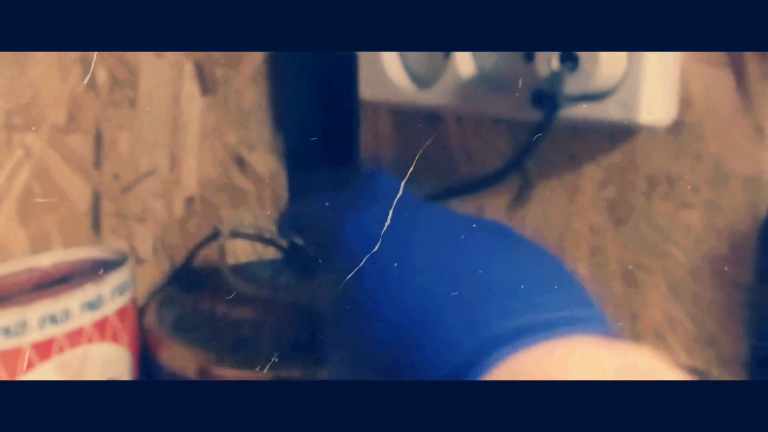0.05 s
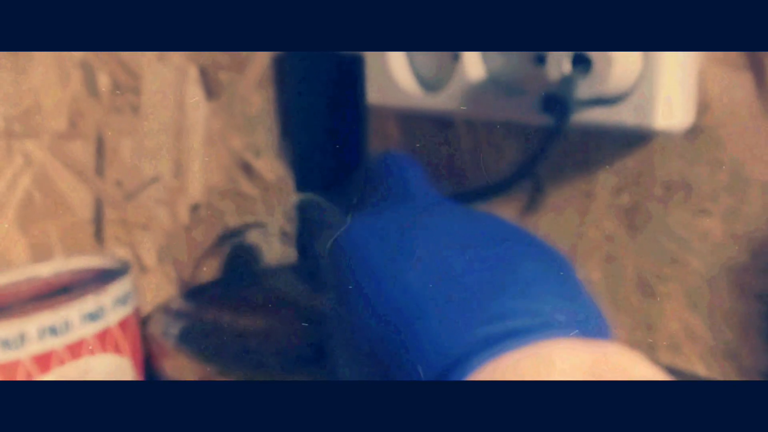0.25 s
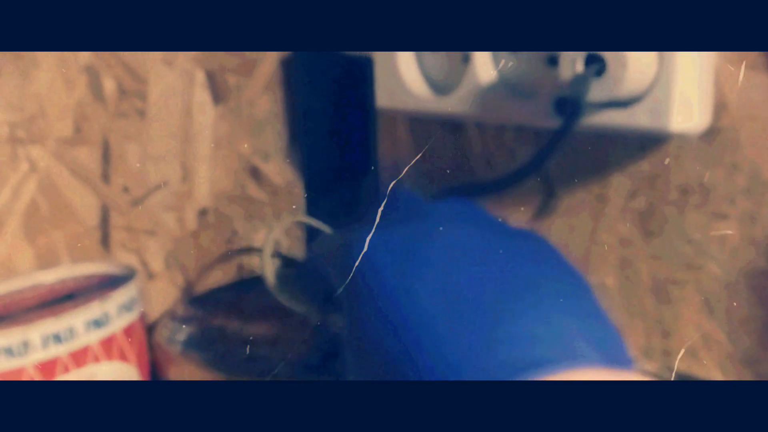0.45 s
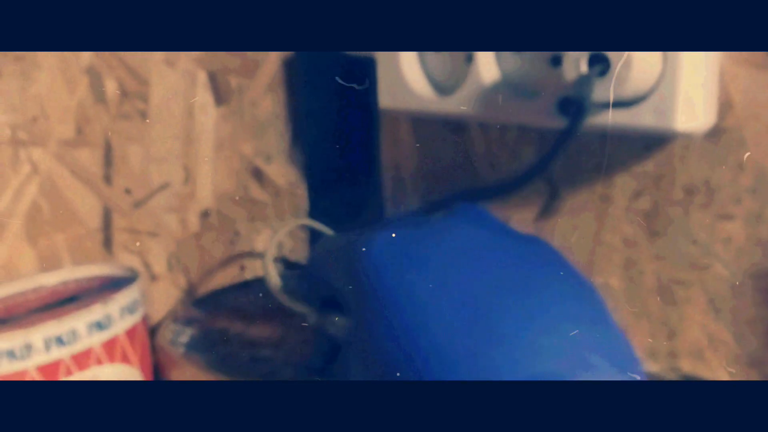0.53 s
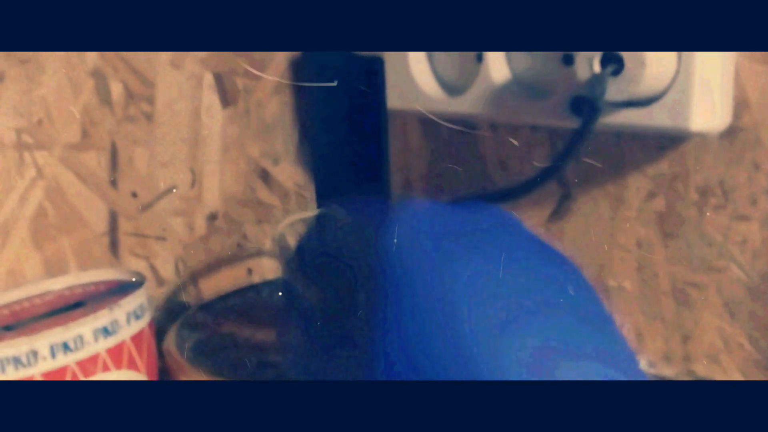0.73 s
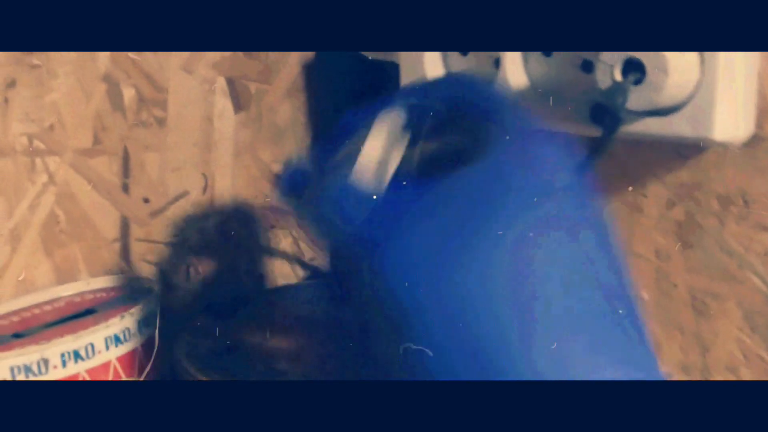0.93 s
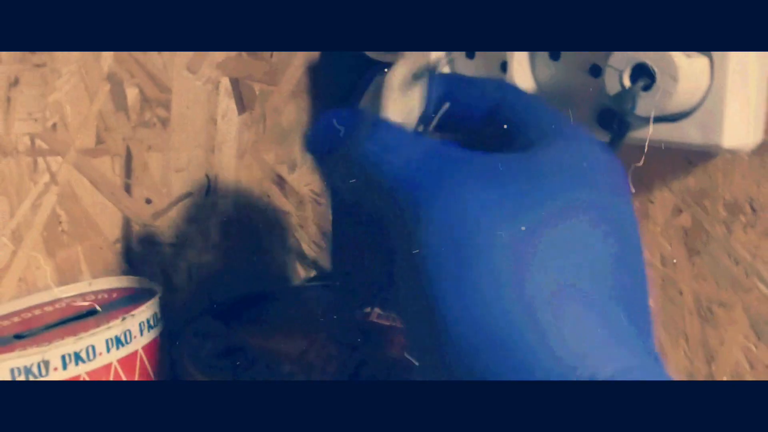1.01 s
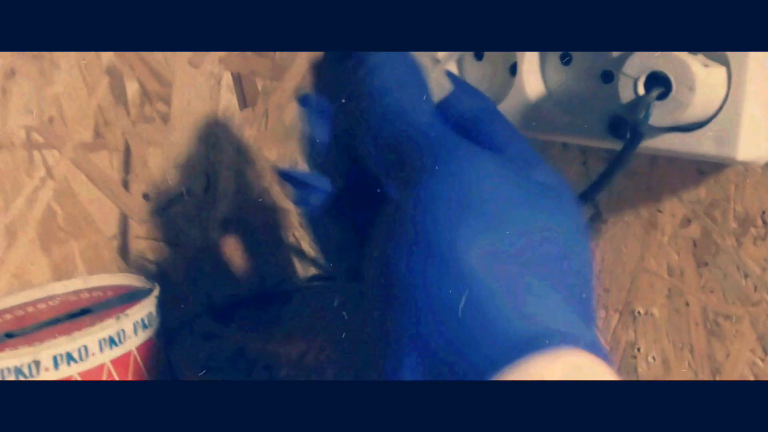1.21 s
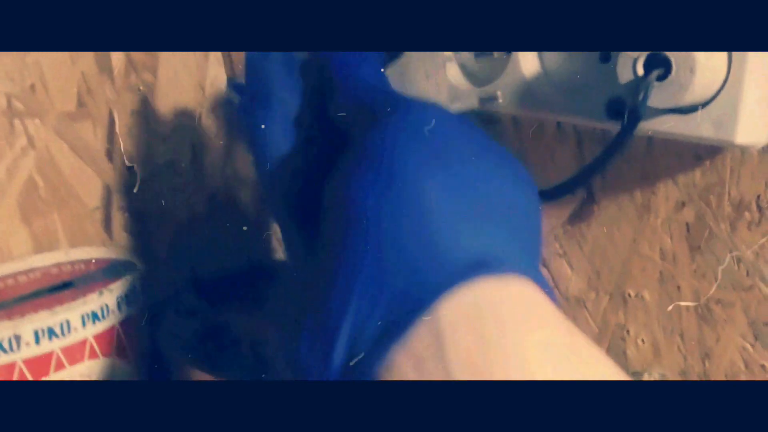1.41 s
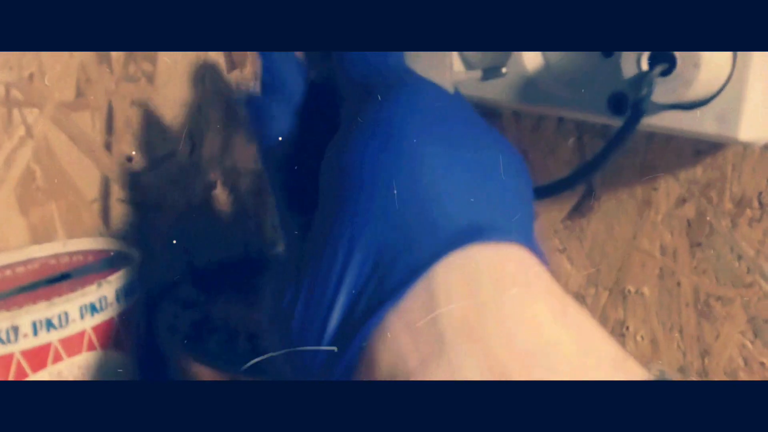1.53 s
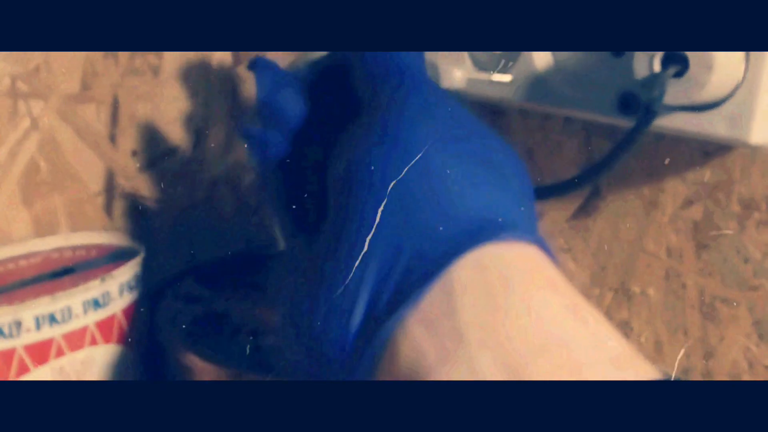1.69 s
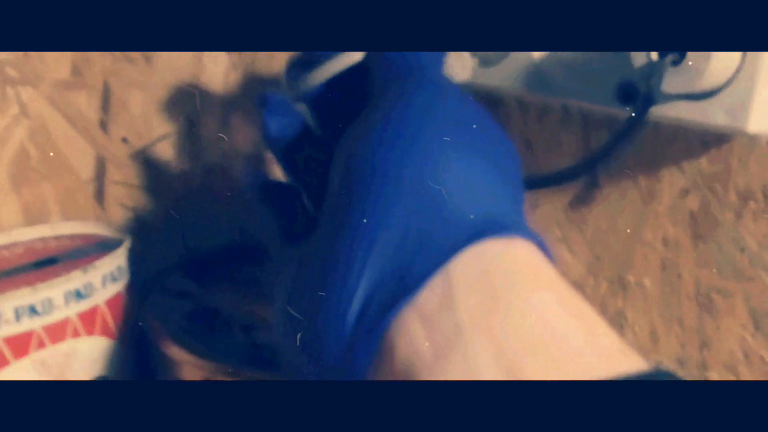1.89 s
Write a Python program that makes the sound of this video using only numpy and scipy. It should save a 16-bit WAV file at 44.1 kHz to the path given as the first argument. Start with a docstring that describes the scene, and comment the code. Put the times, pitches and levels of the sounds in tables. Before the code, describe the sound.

A tin can knocks three times in quick succession on a wooden bench, thudding and ringing briefly. A rubber-gloved hand then shuffles things with soft bumps, light ticks, short drags and swishes, heard close in a small quiet workshop.

```python
"""Faint room noise and two soft bumps, then a tin can knocks three times on a wooden bench.
At each knock the bench thuds, the tin rings and the contact cracks. The rubber-gloved hand
then shuffles things about: padded bumps, light ticks, short drags and swishes of the glove.
A small quiet workshop, heard from close by through a stereo microphone with two close ports."""
import sys
import numpy as np
from scipy import signal
from scipy.fft import rfft, irfft
from scipy.io import wavfile

SR = 44100
rng = np.random.default_rng(int(sys.argv[2]) if len(sys.argv) > 2 else 0)


def int16_out(signal):
    """Quantize to a 16-bit WAV file."""
    q = np.round(np.clip(np.atleast_2d(signal).T, -1, 1) * 32767)
    wavfile.write(sys.argv[1], SR, q.astype(np.int16))


N = 85995
HIT_SIZE = 20480  # samples in one blow or echo

# spectrum of the wooden bench top, struck or rubbed: frequency_hz, level_db
WOOD_SPECTRUM = [(30, -54), (80, -32), (130, -17.5), (180, -6), (300, 1), (420, 2), (660, -1), (800, -11.5),
                 (1200, -22.5), (2500, -35), (8000, -73)]


def undb(db):
    """Decibels to gain."""
    return 10 ** (np.asarray(db) / 20)


def unit(x):
    """Scale to rms 1."""
    return x / np.sqrt(np.mean(x ** 2))


def clock(size=N):
    """Sample times in seconds."""
    return np.arange(size) / SR


def fade(t60_s):
    """Exponential decay from 1."""
    return np.exp(-np.log(1000) * clock(HIT_SIZE) / t60_s)


def attack(rise_s):
    """Exponential rise toward 1."""
    return 1 - np.exp(-clock(HIT_SIZE) / rise_s)


def shape(x, gain):
    """Filter a sound by a gain that is a function of frequency."""
    size = x.shape[-1]
    hz = np.maximum(np.fft.rfftfreq(size, 1 / SR), 1)
    return irfft(rfft(x) * gain(hz), size)


def along(f, points):
    """Read (Hz, value) points on a log-frequency axis."""
    hz, value = np.array(points).T
    return np.interp(np.log(f), np.log(hz), value)


def colour(x, points):
    """Give a sound a spectrum of (Hz, dB) points, at rms 1."""
    return unit(shape(x, lambda f: undb(along(f, points))))


def resonance(x, hz, width):
    """One broad resonance, its width a share of its pitch, at rms 1."""
    return unit(shape(x, lambda f: 1 / (1 + ((f / hz - hz / f) / width) ** 2)))


def noise(size=N, side=0.079):
    """Noise at the two microphone ports: alike in the bass, partly unrelated above."""
    mid, apart = rng.standard_normal((2, size))
    apart = side * shape(apart, lambda f: f / np.hypot(f, 940))
    return np.array([mid + apart, mid - apart])


def add(out, start_s, x):
    """Mix a sound in at its time."""
    i = int(np.clip(start_s * SR, 0, N - 1))
    out[:, i:i + x.shape[-1]] += x[..., :N - i]


def grain(spread_db=2.5, rate_hz=921):
    """Uneven grip of a sliding surface, as a gain."""
    grip = np.interp(clock() * rate_hz, np.arange(N), rng.standard_normal(N))
    return unit(undb(spread_db * grip))


def swell(middle_s, half_length_s):
    """A stroke that rises and falls."""
    return 1 / np.cosh(np.clip(1.28 * (clock() - middle_s) / half_length_s, -20, 20))


def ring(modes):
    """Decaying modes after one blow, one row each."""
    t = clock(HIT_SIZE)
    return np.array([undb(db) * fade(t60) * np.sin(2 * np.pi * hz * t) for hz, db, t60 in modes])


def room_tone():
    """The workshop's faint steady noise, wide around the microphone."""
    # spectrum of the quiet room: frequency_hz, relative_db
    air_spectrum = [(25, -28), (70, -42), (120, -7), (180, -0.5), (300, -0.5), (470, -3.5), (620, 3),
                    (800, -7), (1100, -6), (1700, -11.5), (3300, -15.5), (7000, -14), (11000, -18),
                    (14800, -27), (16000, -53)]
    return undb(-52.5) * colour(noise(side=0.9), air_spectrum)


def bench_ring():
    """The wooden top's modes build up and die away after a blow."""
    # modes of the bench: pitch_hz, relative_db, t60_s
    bench_modes = [(178, -30, .22), (228, -27, .12), (290, -23, .12), (345, -23, .09), (403, -17, .14),
                   (445, -19, .09), (577, -18.5, .165), (596, -24, .24), (664, -20, .14), (715, -23, .06)]
    return ring(bench_modes).sum(axis=0) * attack(0.0026)


def thud(hz, bench, lag_cycles=0.6, width_cycles=0.55):
    """The bench top gives once under a blow, then its modes and a dense boom die away."""
    cycles = clock(HIT_SIZE) * hz - lag_cycles
    pulse = np.exp(-.5 * (cycles / width_cycles) ** 2)
    bend = pulse * np.sin(2 * np.pi * cycles) * attack(0.00061)
    push = np.gradient(bend) * SR / (2 * np.pi * hz)
    boom = colour(noise(HIT_SIZE), WOOD_SPECTRUM) * fade(t60_s=0.12) * attack(0.001)
    return undb(-1.5) * push - undb(1) * bench + undb(-17) * boom


def bumps(bench):
    """Padded blows that sound only the bench."""
    # soft bumps: start_s, relative_db, pitch_hz
    blows = [(0.134, -38, 565), (0.183, -40, 596), (0.2365, -47, 503), (0.2815, -22, 520),
             (0.2913, -19, 470), (0.357, -30.5, 295), (0.4014, -23.5, 436), (0.4765, -22.5, 343),
             (0.503, -29.5, 405), (0.522, -32, 437), (0.538, -34, 420), (0.557, -40, 286),
             (0.730, -34.5, 450), (0.747, -29, 474), (0.813, -36.5, 353), (1.0015, -38, 610),
             (1.16, -30, 450), (1.188, -38.5, 252), (1.278, -36.5, 310), (1.292, -39.5, 176),
             (1.311, -36, 336), (1.334, -40, 180), (1.609, -38, 292), (1.633, -41.5, 186),
             (1.713, -43, 474), (1.735, -38, 340), (1.757, -34.5, 183), (1.7828, -30, 607),
             (1.838, -34, 506), (1.849, -29, 410), (1.861, -29.5, 390), (1.9105, -31.5, 590)]
    out = np.zeros((2, N))
    for start, db, hz in blows:
        add(out, start, undb(db) * thud(hz, bench))
    return out


def ticks():
    """Tiny contacts and rattles, damped at once by the glove."""
    # ticks of metal and snapping rubber: start_s, level_db, pitch_hz
    contacts = [(0.1689, -39, 6540), (0.17, -49, 6800), (0.2207, -19, 3800), (0.2241, -26.5, 4170),
                (0.2745, -20.5, 1130), (0.3008, -27, 1950), (0.394, -22.5, 1470), (0.509, -43, 2170),
                (0.511, -35, 950), (0.732, -48, 5000), (0.7445, -42.5, 2280), (1.0445, -35, 2800),
                (1.044, -44, 950), (1.115, -41.5, 5500), (1.199, -44.5, 2280), (1.228, -41.5, 2210),
                (1.2885, -37, 8850), (1.3742, -39.5, 5570), (1.4922, -37, 3100), (1.57, -23, 2850),
                (1.715, -41.5, 2940), (1.7835, -37.5, 3220), (1.8104, -44, 1670), (1.812, -38.5, 12300),
                (1.823, -35, 2730), (1.9255, -41, 2670)]
    out = np.zeros((2, N))
    for start, db, hz in contacts:
        tick = resonance(noise(HIT_SIZE), hz, width=0.59) * fade(t60_s=0.015)
        add(out, start, undb(db) * tick)
    return out


def can_knocks(bench, spread_octaves=1.23):
    """Each contact thuds the bench, rings the tin and cracks; each has its own brightness."""
    # contacts that cluster into three knocks, at relative levels:
    # start_s, thud_db, thud_pitch_hz, ring_db, crack_db, brightness_hz
    contacts = [(0.2209, -51, 590, -32, -33.5, 7860), (0.2227, -12, 435, -35, -29.5, 8000),
                (0.231, -22, 520, -40, -39, 5000), (0.2707, -20, 604, -55, -33, 4520),
                (0.2738, -0.5, 380, -9, -24, 2090), (0.2989, -44, 610, -39, -32.5, 2660),
                (0.332, -31, 450, -25.5, -37.5, 3220), (0.3605, -58, 450, -57, -48, 12000),
                (0.363, -54, 500, -38, -32, 10200), (0.393, -15, 423, -18, -16.5, 7900),
                (0.3976, -18, 430, -34, -26.5, 9000)]
    # modes of the can: pitch_hz, relative_db, t60_s
    tin_modes = [(1026, -17, .18), (1146, -15, .11), (1371, -9, .13), (1829, -18, .35), (2135, -8, .12),
                 (2432, -8, .13), (2760, -6, .1), (3040, -10, .1), (3267, -12, .11), (3693, -9, .1),
                 (3912, -11, .09), (3996, -10, .11), (4400, -13, .07), (5440, -9, .08)]
    # spectrum of tin striking wood: frequency_hz, relative_db
    crack_spectrum = [(100, -66), (350, -45), (900, -4), (1200, -11), (1400, 2), (1750, -3), (2100, 0.5),
                      (2700, 2.5), (4300, -0.5), (5400, 0), (6200, -6), (7500, -1.5), (9000, -5),
                      (10200, -1.5), (12800, -6.5), (16000, -21)]
    mode_hz = np.array(tin_modes)[:, 0]
    partials = ring(tin_modes) * attack(0.0039)
    out = np.zeros((2, N))
    for start, thud_db, hz, ring_db, crack_db, bright_hz in contacts:
        crack = colour(noise(HIT_SIZE), crack_spectrum)
        dulled = shape(crack, lambda f: (1 + (f / bright_hz) ** 2) ** -.7)
        crack = unit(dulled) * fade(t60_s=0.039)
        # modes near a quarter of the brightness ring most
        octaves_off = np.log2(mode_hz / (0.25 * bright_hz))
        tin = undb(-3.5) * np.exp(-.5 * (octaves_off / spread_octaves) ** 2) @ partials
        add(out, start, undb(thud_db) * thud(hz, bench) + undb(ring_db) * tin + undb(crack_db) * crack)
    return out


def drags():
    """Sticking and slipping rumbles in the bench and scrapes at the contact."""
    # things dragged on the bench: middle_s, half_length_s, rumble_db, scrape_db
    strokes = [(0.49, 0.062, -45, -55), (0.737, 0.026, -47, -51), (0.884, 0.023, -55.5, -55.5),
               (1.077, 0.057, -54, -55.5), (1.217, 0.053, -47.5, -54.5), (1.315, 0.017, -51.5, -53),
               (1.395, 0.023, -51, -60), (1.508, 0.06, -67, -56.5), (1.589, 0.031, -50, -52.5),
               (1.732, .022, -40.5, -51), (1.828, .036, -41, -48.5), (1.945, 0.027, -41.5, -50)]
    rumble = sum(undb(db) * swell(middle, half) for middle, half, db, _ in strokes)
    scrape = sum(undb(db) * swell(middle, half) for middle, half, _, db in strokes)
    # spectrum of the sliding contact: frequency_hz, relative_db
    scrape_spectrum = [(300, -24), (900, -1), (1400, 3.5), (2400, 4.5), (3600, 1.5), (5500, -2),
                       (9000, -8.5), (16000, -28)]
    slips = noise() * grain()
    return rumble * colour(slips, WOOD_SPECTRUM) + scrape * colour(slips, scrape_spectrum)


def glove_swishes():
    """Rubber slips in short grainy swishes."""
    # slips of the glove: middle_s, half_length_s, relative_db, pitch_hz
    strokes = [(0.531, 0.01, -47, 4580), (0.729, 0.011, -45.5, 7500), (0.783, 0.0067, -53, 6500),
               (0.88, 0.023, -47, 8140), (0.921, 0.008, -47, 7850), (1.081, 0.014, -47, 6500),
               (1.114, 0.0057, -47.5, 9000), (1.243, 0.037, -45.5, 8000), (1.318, 0.0057, -38, 7900),
               (1.4, 0.035, -51.5, 9700), (1.431, 0.0046, -40, 12200), (1.548, 0.038, -51, 9200),
               (1.563, 0.0077, -34.5, 9300), (1.678, 0.01, -47.5, 9150), (1.729, 0.0094, -50.5, 7500),
               (1.836, 0.03, -47.5, 7400), (1.943, 0.038, -47, 7950)]
    rub = noise()
    swishes = sum(undb(db) * swell(middle, half) * resonance(rub, hz, width=1.14)
                  for middle, half, db, hz in strokes)
    return undb(-2) * swishes * grain()


def echo_decay(t60_s, delay_s=0.004):
    """An echo's envelope at energy 1: silent while the sound travels, then dying away."""
    return unit(fade(t60_s) * (clock(HIT_SIZE) > delay_s)) / np.sqrt(HIT_SIZE)


def room_echo(x):
    """Quick reflections off the near wall, then a diffuse echo that is shorter in the treble."""
    # decay of the workshop by band: centre_hz, t60_s, relative_db
    bands = [(150, 0.78, -15), (428, 0.4, -26), (1010, 0.39, -9.5), (2450, 0.24, -15.5), (5850, 0.13, -7),
             (13000, 0.21, -14)]
    log_centres = np.log([hz for hz, _, _ in bands])
    wash = noise(HIT_SIZE, side=0.5)
    early = shape(noise(HIT_SIZE, side=0.5), lambda f: f / np.hypot(f, 1200))
    response = undb(-15.5) * early * echo_decay(t60_s=0.089)
    for share, (_, t60, db) in zip(np.eye(len(bands)), bands):
        band = shape(wash, lambda f: np.interp(np.log(f), log_centres, share))
        response += undb(db) * band * echo_decay(t60)
    return signal.fftconvolve(x, response, axes=1)[:, :N]


def scene():
    """Handling close to the microphone, with the workshop's echo and room tone behind it."""
    bench = bench_ring()
    close = can_knocks(bench) + bumps(bench) + ticks() + glove_swishes() + drags()
    return close + room_echo(close) + room_tone()


def record(dry):
    """The ports differ in level and phase; the recorder trims bass and treble and clips the peaks."""
    # balance between the ports: frequency_hz, left_minus_right_db
    balance = [(60, -7), (110, -1.5), (200, -2.0), (380, -2.5), (700, -7.5), (1290, -1.5), (2380, 2.5),
               (4400, 1.5), (8120, 1.0), (15000, 0.5)]
    # phase between the ports: frequency_hz, left_lead_rad
    lead = [(0, 0), (690, 0.23), (1210, 1.77), (2150, 1.15), (3530, 0.6), (4310, 0.59), (5860, 0.5),
            (7580, 0.51), (8010, 0), (8270, 0.43), (11700, 0.5), (15900, 0.59)]
    low_cut_hz, notch_hz, top_hz = 20, 9030, 15350
    sides = np.array([[.5], [-.5]])
    ports = shape(dry, lambda f: undb(sides * along(f, balance)) * np.exp(1j * sides * along(f, lead)))
    thinned = shape(ports, lambda f: f / np.hypot(f, low_cut_hz))
    notched = signal.lfilter(*signal.iirnotch(notch_hz, Q=16, fs=SR), thinned)
    top_cut = signal.ellip(8, .2, 70, top_hz, fs=SR, output="sos")
    return signal.sosfilt(top_cut, np.clip(notched, -1, 1))


dry = scene()
out = record(dry)
int16_out(out)
```